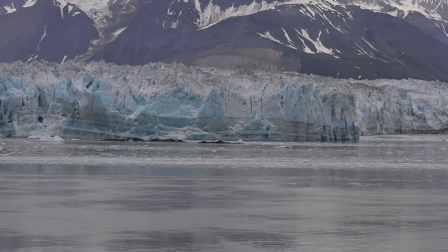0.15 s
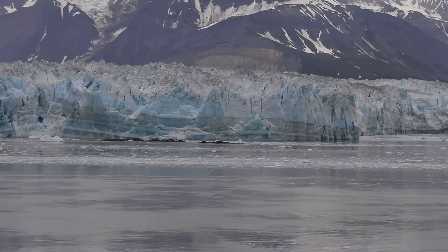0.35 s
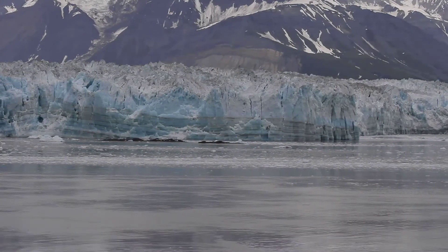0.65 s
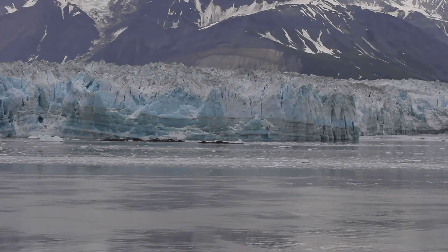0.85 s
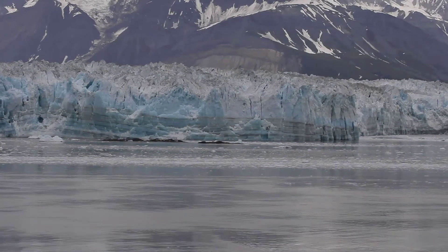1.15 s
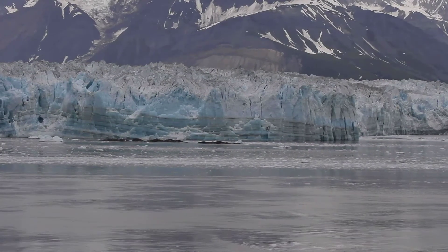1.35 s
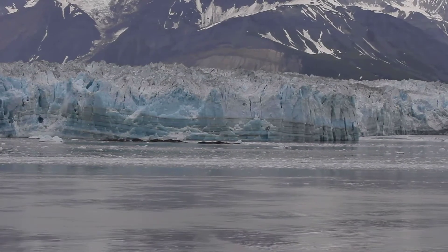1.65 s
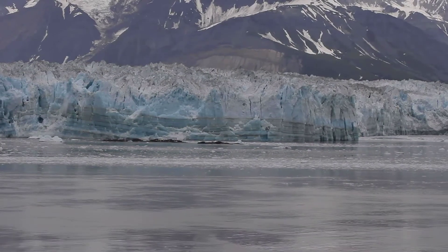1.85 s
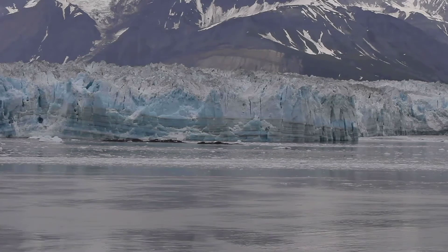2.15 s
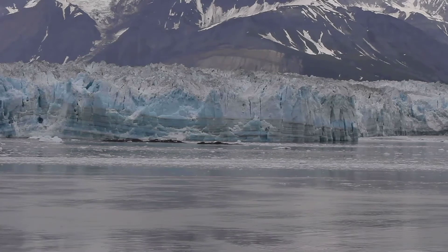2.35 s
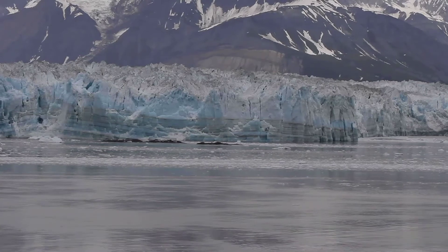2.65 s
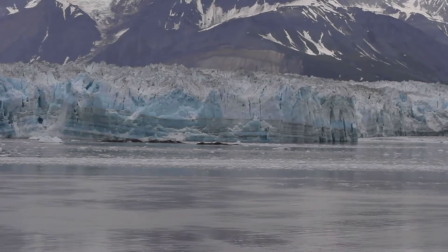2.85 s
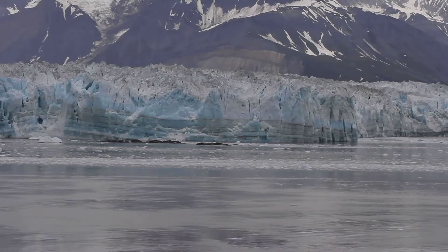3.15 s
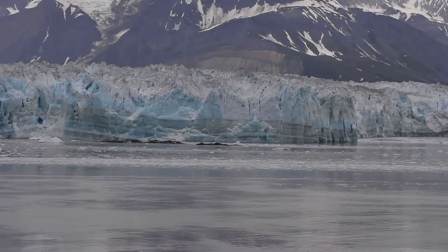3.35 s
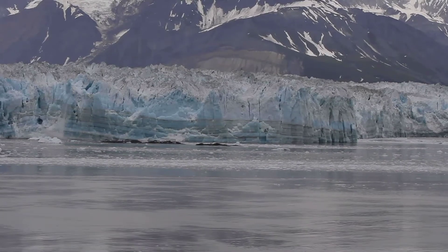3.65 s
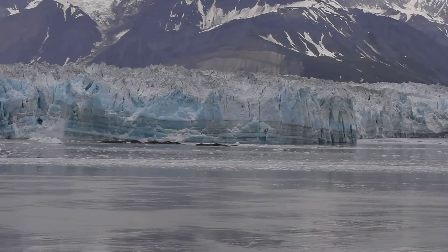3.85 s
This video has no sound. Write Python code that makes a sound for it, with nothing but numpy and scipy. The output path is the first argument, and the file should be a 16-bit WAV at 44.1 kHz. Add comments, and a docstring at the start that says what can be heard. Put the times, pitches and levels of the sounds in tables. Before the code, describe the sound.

Ice falling from a glacier, first a faint dying rush, then sudden cracks and heavy low thunder.

```python
"""A rush of falling ice and water dies away across a bay, with booms and a crack in it. A few more cracks
follow, then a heavy fall from the glacier face roars with deep booms. Rush, roar and cracks are shaped random
noise; booms are short swelling tones that sag in pitch. A small camera stores it at a low sample rate with
held steps, which mirrors the sound into the treble."""
import sys
import numpy as np
from scipy import signal
from scipy.io import wavfile
from scipy.ndimage import uniform_filter1d

SR = 44100
rng = np.random.default_rng(int(sys.argv[2]) if len(sys.argv) > 2 else 0)


def field_ratio(decibels):
    """Amplitude ratio for a level in dB (20 dB per decade); scalars and array-likes work."""
    return 10 ** (np.asarray(decibels, dtype=float) / 20)


def master_out(mix):
    """Clip the mix to full scale and print it as 16-bit PCM to the path in sys.argv[1]."""
    frames = np.transpose(np.atleast_2d(mix))
    ceiling = np.clip(frames, -1, 1)
    pcm = np.round(ceiling * 32767).astype(np.int16)
    wavfile.write(sys.argv[1], SR, pcm)


N = 176400  # samples: 4 seconds

# Loudness of the rush over time: start_s, level_db, left_minus_right_db
RUSH_LEVEL = [(0.0, -42.5, 0.5), (0.67, -43, 0.5), (0.73, -44, 0), (0.75, -41, -1.5), (0.79, -42.5, 1.0),
              (0.97, -45.5, 0.0), (1.28, -55.5, 1.5), (1.37, -49.5, 2), (1.58, -51.5, 0.5),
              (1.66, -52, 0.0), (2.09, -55.5, 0.0), (2.17, -49.5, -1.5), (2.19, -54.5, -1.5),
              (2.59, -54, 1), (2.6, -52.5, -0.5), (2.74, -54, 1)]
# Tone colour of the rush while loud, and once soft: pitch_hz, density_db_per_hz
RUSH_LOUD_COLOUR = [(15, -46.5), (25, -14), (111, -11.5), (162, -1), (464, -2.5), (598, -5.5), (753, -4.5),
                    (1780, -11.5), (3420, -22.5), (3800, -22.5), (4940, -60), (8360, -120)]
RUSH_SOFT_COLOUR = [(15, -47), (25, -37), (76, -4), (376, -7), (418, -5), (505, -6.5), (753, -6.5),
                    (1050, -9), (2070, -13.5), (3800, -24), (4940, -49), (8360, -120)]
# How alike left and right are in the rush: pitch_hz, likeness (1 = the same)
RUSH_LIKENESS = [(60, 0.96), (130, 0.87), (290, 0.9), (640, 0.87), (1410, 0.58), (3100, 0.15), (6820, 0.12),
                 (15000, 0.54)]
# Booms of big blocks landing, before a shared level cut: start_s, peak_db, pitch_hz, left_minus_right_db
BOOM_LIST = [(0.484, -30, 510, 3), (0.74, -30, 392, -5), (1.378, -42, 193, -5), (2.764, -39, 128, 7),
             (2.813, -43, 149, 9), (3.077, -36, 150, 10), (3.11, -22.5, 159.6, 6), (3.181, -21, 160, 6),
             (3.262, -17.5, 131, 12), (3.348, -19, 72.3, 8), (3.37, -16.5, 145, 8),
             (3.424, -14.5, 132, 4.5), (3.482, -14.5, 131.5, 10), (3.558, -18, 154, 0.0),
             (3.646, -17.5, 95, 1), (3.68, -21, 129, 0), (3.731, -24.5, 91.6, -9)]
# Cracks in the ice: start_s, peak_db, left_minus_right_db, time_to_fall_60_db_s
CRACK_LIST = [(0.743, -31, 1, 0.32), (2.76, -32.5, 5, 0.81), (2.803, -29, 4, 0.45), (2.859, -38, -4, 0.54),
              (2.921, -27.5, 7, 0.37), (2.96, -33, 3, 1), (3.019, -37.5, 1.5, 0.97),
              (3.064, -32.5, 2.0, 0.94), (3.114, -25.5, 6.5, 0.51), (3.157, -19, 4, 0.41),
              (3.188, -20, 1, 0.28), (3.312, -34, 7, 0.57), (3.631, -19, -1, 0.17)]
# Tone colour of the cracks: pitch_hz, density_db_per_hz
CRACK_TONE = [(30, -30), (70, -8), (150, 0.5), (400, -3.5), (900, -7.5), (1800, -18), (3800, -30.5),
              (5000, -60)]
# How alike left and right are in the cracks and the heavy fall: pitch_hz, likeness (1 = the same)
FALL_LIKENESS = [(60, 0.92), (130, 0.8), (290, 0.86), (640, 0.84), (1410, 0.7), (3100, 0.88), (6820, 0.69),
                 (15000, 0.76)]
# Loudness of the deep rumble under the heavy fall: start_s, level_db
RUMBLE_LEVEL = [(3.04, -71), (3.122, -38.5), (3.24, -36), (3.274, -18), (3.318, -24), (3.37, -22.5),
                (3.392, -21), (3.434, -32), (3.462, -33), (3.498, -20.5), (3.544, -26.5), (3.568, -27.5),
                (3.622, -38), (3.662, -21.5), (3.718, -26.5), (3.732, -26), (3.97, -32), (4.0, -37)]
# Tone colour of the rumble: pitch_hz, density_db_per_hz
RUMBLE_TONE = [(20, -35), (34, -12.5), (54, -2.5), (135, -1), (154, -2), (210, -10.5), (320, -14),
               (420, -47), (700, -120)]
# Loudness of the roar of the heavy fall: start_s, level_db, left_minus_right_db
ROAR_LEVEL = [(3.15, -36, 6), (3.16, -31.5, 3), (3.172, -43, 17), (3.206, -30.5, 2), (3.222, -38, 9),
              (3.254, -32, 2.5), (3.266, -26, 4), (3.282, -32, 1.5), (3.37, -33, 5), (3.52, -32, 3.5),
              (3.698, -35, 1), (3.77, -34, 1.5), (3.778, -37.5, 4), (3.808, -34.5, 1), (3.868, -32, 2.5),
              (3.876, -35, 3), (3.95, -32, 1.0), (4.0, -35.5, 3)]
# Tone colour of the roar: pitch_hz, density_db_per_hz
ROAR_TONE = [(120, -28), (200, -6), (351, -6.5), (574, -7), (634, -9), (708, -10.5), (1180, -16.5),
             (1320, -19.5), (1820, -20.5), (2200, -27.5), (2860, -43), (4840, -120)]
# Loudness of the roar's treble: start_s, level_db, left_minus_right_db
TREBLE_LEVEL = [(3.14, -62, 2.5), (3.182, -54, 3.5), (3.256, -58, 5), (3.268, -48, 1.5), (3.334, -60, 5),
                (3.366, -64, -0.5), (3.388, -52, -4.5), (3.414, -52, -9), (3.47, -55, -2),
                (3.654, -53, 1.5), (3.692, -56, 0.5), (3.754, -51.5, 2), (3.79, -60, 0.0), (3.824, -54, 3),
                (3.956, -48, 4), (3.978, -60, 2.0), (3.988, -74, 1.5), (4.0, -64, 0.0)]
# Tone colour of that treble: pitch_hz, density_db_per_hz
TREBLE_TONE = [(1350, -35), (2300, -0.5), (3350, -5), (3800, -10), (4940, -42), (8360, -120)]
# Narrow tones that stand out briefly in all the noise: pitch_hz, depth_db
STREAK_DEPTH = [(300, 0.77), (1000, 1.5), (2500, 4)]
# Level against its neighbours at which a narrow bin gets half the gate's cut: pitch_hz, level_db
GATE_LEVEL = [(300, -11), (1000, -5.5), (2000, -4), (3600, -1)]


def evened(x):
    """Scales a signal to an average (rms) strength of 1."""
    return x / np.sqrt(np.mean(x ** 2) + 1e-20)


def read(points, hz):
    """Reads a table between its rows, along a logarithmic pitch scale."""
    f, value = np.transpose(points)
    return np.interp(np.log(hz + 1), np.log(f + 1), value)


def sides(pan_db):
    """Gains of left and right that differ by pan_db."""
    return field_ratio(np.array([pan_db / 2, -pan_db / 2]))


def level(table):
    """Gain along a loudness table for each side: silent before it, fading slowly after it."""
    fade_db_per_s = 5
    t, rows = np.arange(N) / SR, np.transpose(table)
    db = np.interp(t, rows[0], rows[1], left=-150)
    db = db - fade_db_per_s * np.maximum(t - rows[0, -1], 0)
    pan_db = np.interp(t, rows[0], rows[2]) if len(rows) > 2 else np.zeros(N)
    return field_ratio(db) * sides(pan_db)


def noise(colour, likeness, size, patchy_db, flicker_db):
    """Two partly alike channels of random short-time spectra with patches, streaks and a shared flicker."""
    frames, hz = 4 * N // size + 5, np.fft.rfftfreq(size, 1 / SR)
    a, b, c, d, patches, streaks = rng.standard_normal((frames, len(hz), 6)).T
    # Streaks are smoothed in time only, patches in both pitch and time
    streaks = evened(uniform_filter1d(streaks, size=12288 // size, axis=1))
    streaks_db = read(STREAK_DEPTH, hz)[:, None] * streaks
    patches = uniform_filter1d(patches, size=size // 100, axis=0)
    patches = evened(uniform_filter1d(patches, size=8192 // size, axis=1))
    flicker = evened(uniform_filter1d(rng.standard_normal(frames), size=3))
    # The right side is part left side, part noise of its own
    alike = np.clip(read(likeness, hz), -1, 1)[:, None]
    left, own = a + 1j * b, c + 1j * d
    z = np.array([left, alike * left + np.sqrt(1 - alike ** 2) * own])
    z *= field_ratio(read(colour, hz)[:, None] + patchy_db * patches + streaks_db + flicker_db * flicker)
    return evened(signal.istft(z, nperseg=size, noverlap=size * 3 // 4)[1][:, :N])


def rush():
    """Falling ice and water: shaped noise that follows a loudness curve and changes colour as it grows soft."""
    loud_db, soft_db = -44.5, -55.5  # rush levels at which each colour holds alone
    t, rows = np.arange(N) / SR, np.transpose(RUSH_LEVEL)
    loud = np.clip((np.interp(t, rows[0], rows[1]) - soft_db) / (loud_db - soft_db), 0, 1)
    loud_noise = noise(RUSH_LOUD_COLOUR, RUSH_LIKENESS, size=1024, patchy_db=1.2, flicker_db=-0.3)
    soft_noise = noise(RUSH_SOFT_COLOUR, RUSH_LIKENESS, size=1024, patchy_db=1.5, flicker_db=0.5)
    # Square roots keep the power steady while the colours trade places
    return level(RUSH_LEVEL) * (np.sqrt(loud) * loud_noise + np.sqrt(1 - loud) * soft_noise)


def booms():
    """Big blocks landing: each boom is a few pushes of air that swell, die away and sag in pitch."""
    cycles, sag = 3.3, 0.25  # length unit in cycles; extra pitch at the start as a share
    rise = 0.42  # time to the peak, as a share of those cycles
    t, out = np.arange(N) / SR, np.zeros((2, N))
    random_turns = rng.random((len(BOOM_LIST), 1))
    for (s, db, hz, pan_db), turn in zip(BOOM_LIST, random_turns):
        u = np.clip((t - s) * hz / cycles, 0, 4)  # time in length units
        swell = (u / rise * np.exp(1 - u / rise)) ** 1.64
        turns = cycles * u * (1 + sag * np.exp(-u)) + turn
        out += sides(pan_db)[:, None] * field_ratio(db) * swell * np.sin(2 * np.pi * turns)
    return field_ratio(-3.5) * out


def cracks():
    """Cracking ice: each crack is a sudden burst whose echoes off the ice face die away."""
    rise_s, crest_db = 0.0042, 11.5  # crest: how far a noise peak stands above its average
    t, power = np.arange(N) / SR, np.zeros((2, N))
    for s, db, pan_db, t60 in CRACK_LIST:
        u = np.maximum(t - s, 0)
        burst = np.minimum(u / rise_s, 1) * field_ratio(db - crest_db - 60 * u / t60)
        power += (sides(pan_db)[:, None] * burst) ** 2
    return np.sqrt(power) * noise(CRACK_TONE, FALL_LIKENESS, size=1024, patchy_db=2.5, flicker_db=1.6)


def fall():
    """The heavy fall: roar, deep rumble and flickering treble are three noises with their own loudness."""
    roar = noise(ROAR_TONE, FALL_LIKENESS, size=1024, patchy_db=1.5, flicker_db=-0.35)
    rumble = noise(RUMBLE_TONE, FALL_LIKENESS, size=2048, patchy_db=0.5, flicker_db=0.2)
    treble = noise(TREBLE_TONE, FALL_LIKENESS, size=1024, patchy_db=-1.0, flicker_db=1.9)
    rumble = sides(1.2)[:, None] * level(RUMBLE_LEVEL) * rumble  # a little to the left
    return level(ROAR_LEVEL) * roar + level(TREBLE_LEVEL) * treble + rumble


def scene():
    """All the sounds added together."""
    return rush() + fall() + cracks() + booms()


def gate(x):
    """Lowers the weak narrow bins of long frames, so that the strong ones stand out as brief thin tones."""
    drop_db = -14
    hz, _, z = signal.stft(x, SR, nperseg=4096, noverlap=2048, window="cosine")
    power = abs(z) ** 2 + 1e-24
    neighbours = uniform_filter1d(power, size=15, axis=1)
    over_db = 10 * np.log10(power / neighbours) - read(GATE_LEVEL, hz)[:, None]
    z = z * field_ratio(drop_db * np.clip(0.5 - over_db / 3, 0, 1))
    return signal.istft(z, SR, nperseg=4096, noverlap=2048, window="cosine")[1][:, :N]


def held_steps(x):
    """Samples at a low rate and holds each value on a finer grid; the steps mirror the sound into the treble."""
    low_hz, grid_hz = 11024, 47996
    taken = signal.resample(x, N * low_hz // SR, axis=1)
    grid = np.arange(N * grid_hz // SR)
    held = taken[:, grid * low_hz // grid_hz]
    return signal.resample(held, N, axis=1)


def low_pass(x):
    """Removes everything above the highest recorded frequency."""
    return signal.sosfilt(signal.butter(12, 16200, fs=SR, output="sos"), x)


def record(dry):
    """Soft overload, then a gate that lowers weak narrow bins, then the small camera: band limit, held low-rate
    samples and a top edge."""
    knee = field_ratio(-10)  # ceiling of the soft overload
    soft = gate(knee * np.tanh(dry / knee))
    band_filter = signal.firwin(801, 3805, window=("kaiser", 8), fs=SR)  # low-pass, Hz
    band = signal.oaconvolve(soft, band_filter[None], "same")
    edge_filter = signal.firwin(1001, 15740, window=("kaiser", 9), fs=SR)  # low-pass, Hz
    mix = signal.oaconvolve(held_steps(band), edge_filter[None], "same")
    return low_pass(mix)


dry = scene()
out = record(dry)
master_out(out)
```